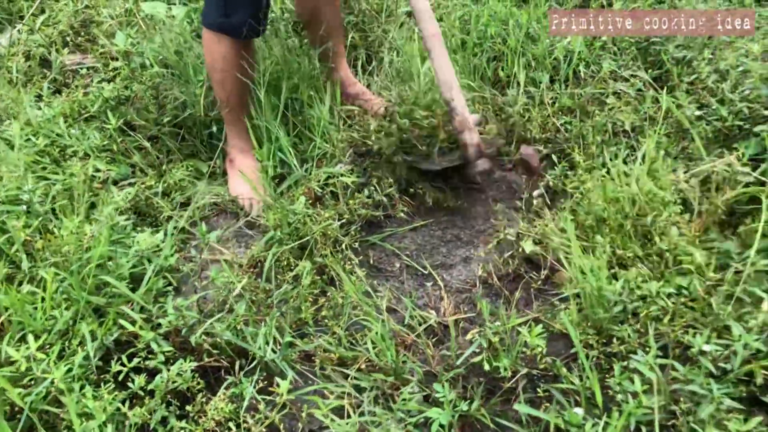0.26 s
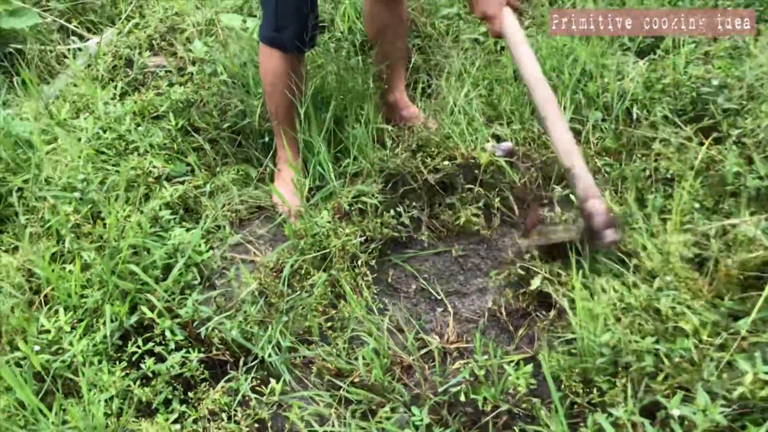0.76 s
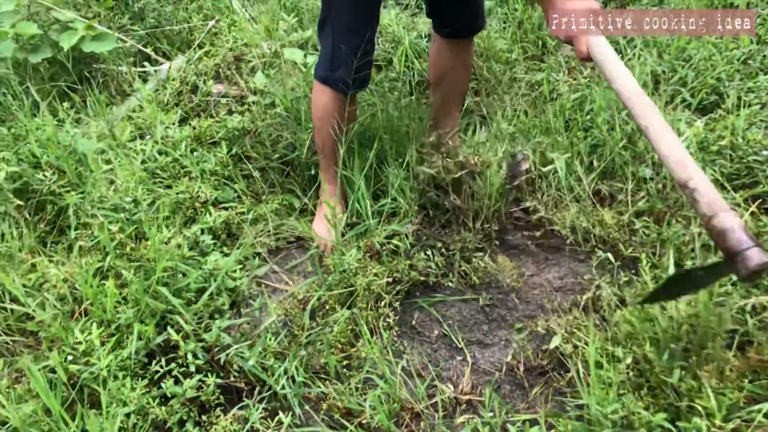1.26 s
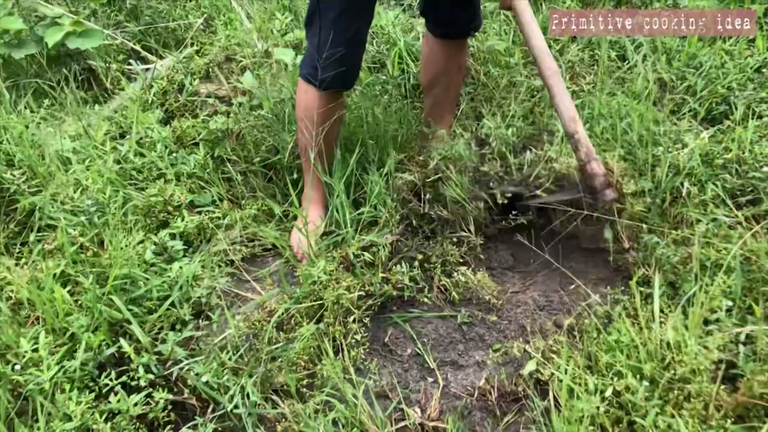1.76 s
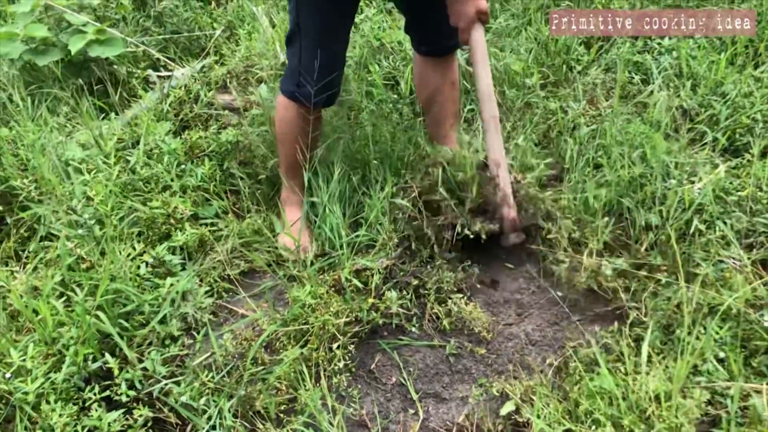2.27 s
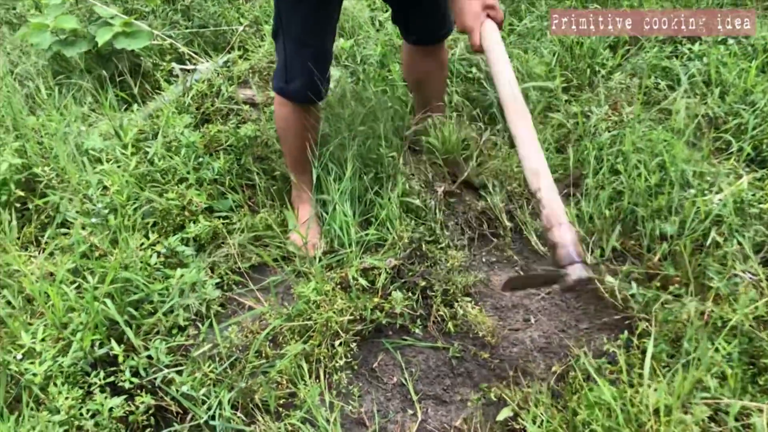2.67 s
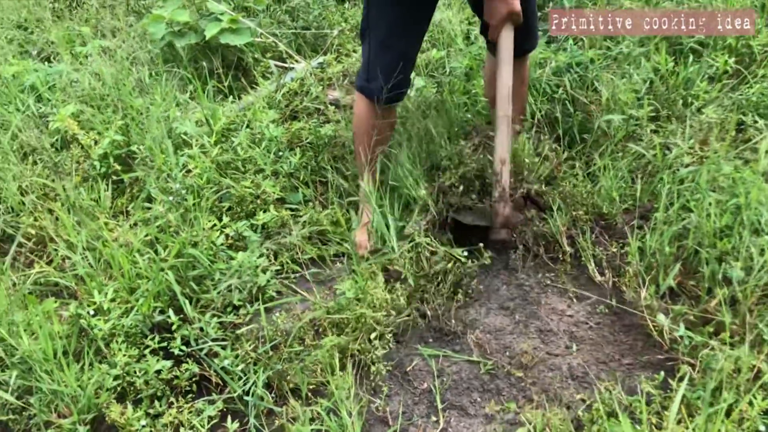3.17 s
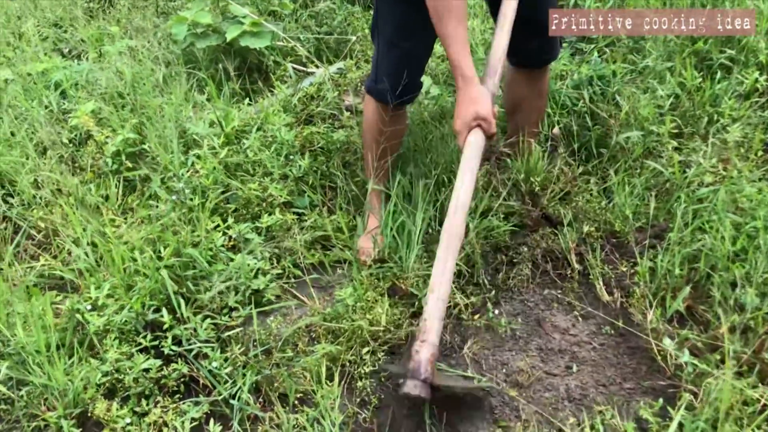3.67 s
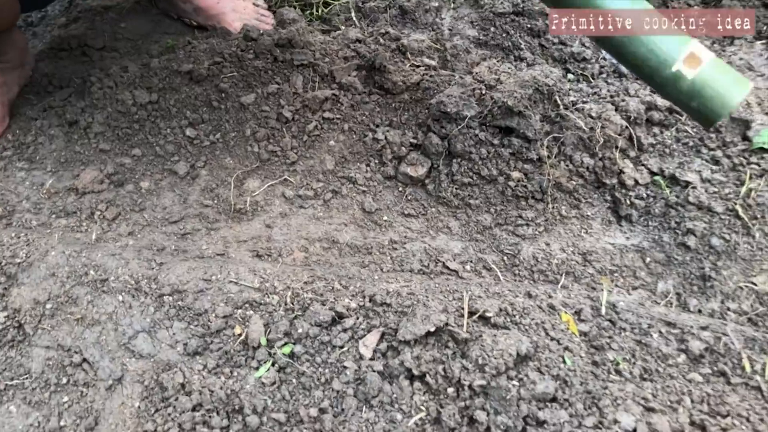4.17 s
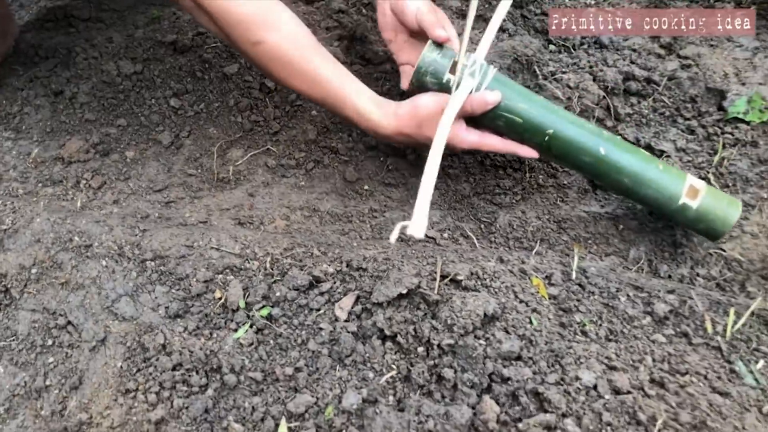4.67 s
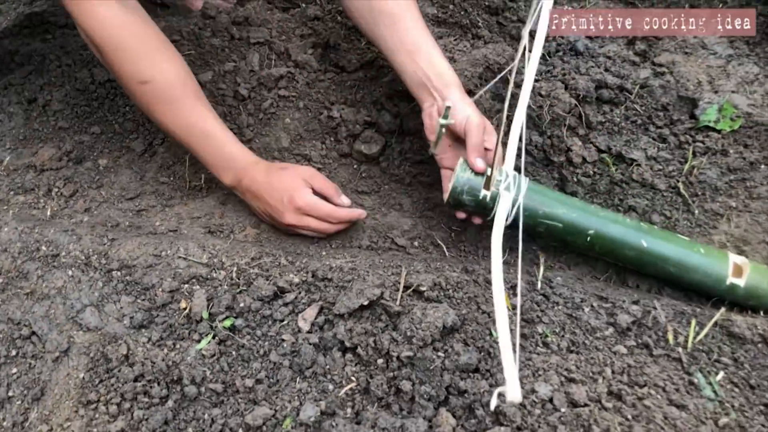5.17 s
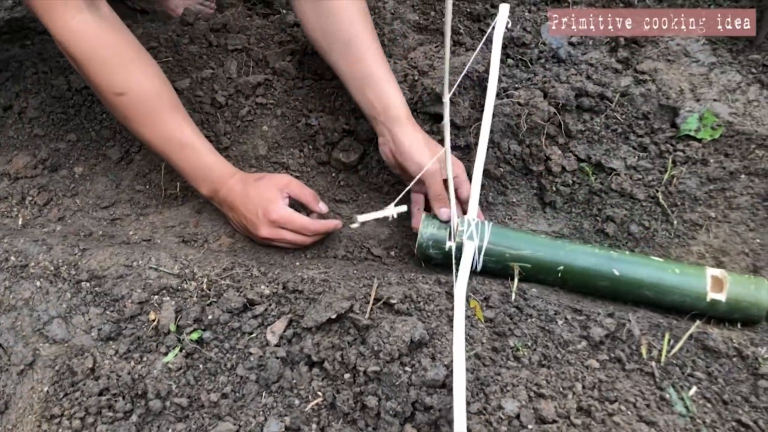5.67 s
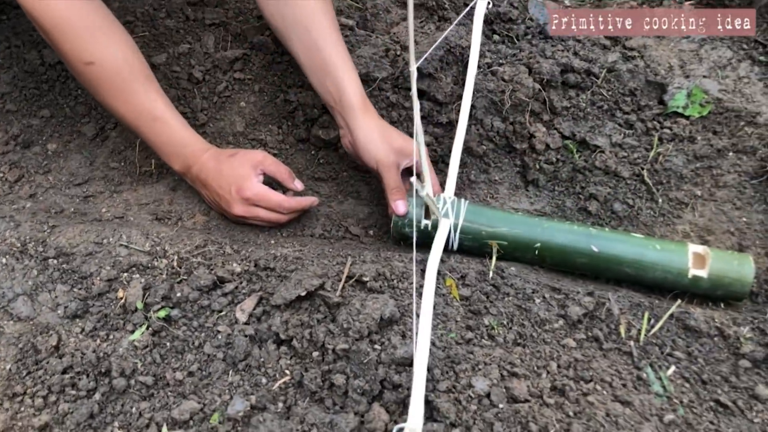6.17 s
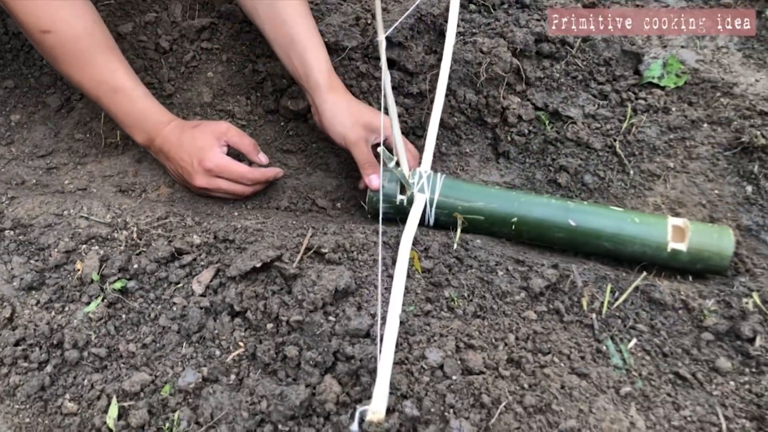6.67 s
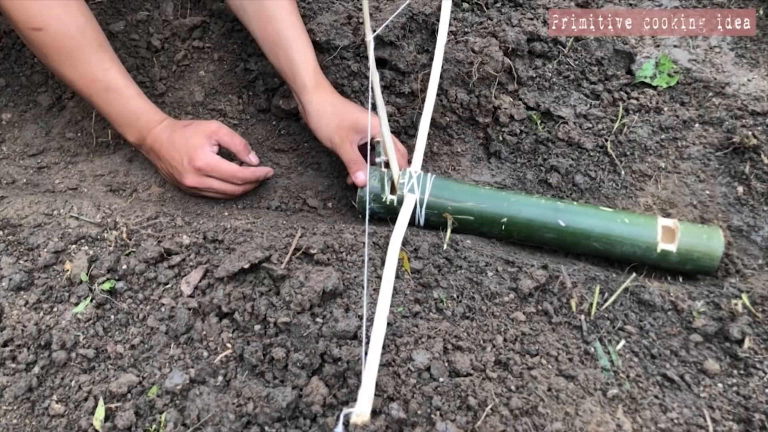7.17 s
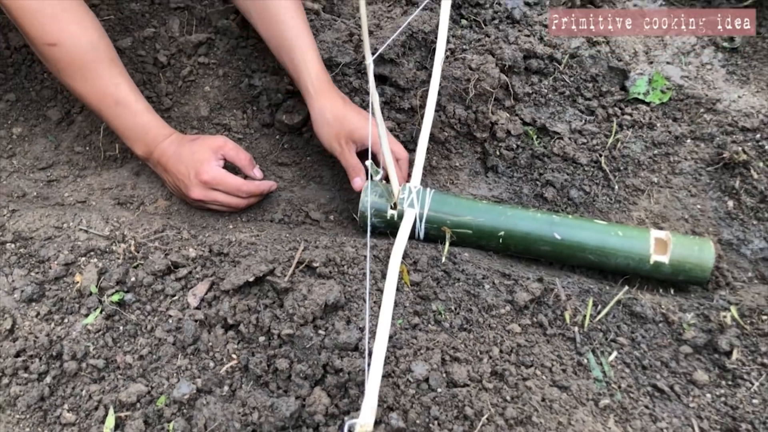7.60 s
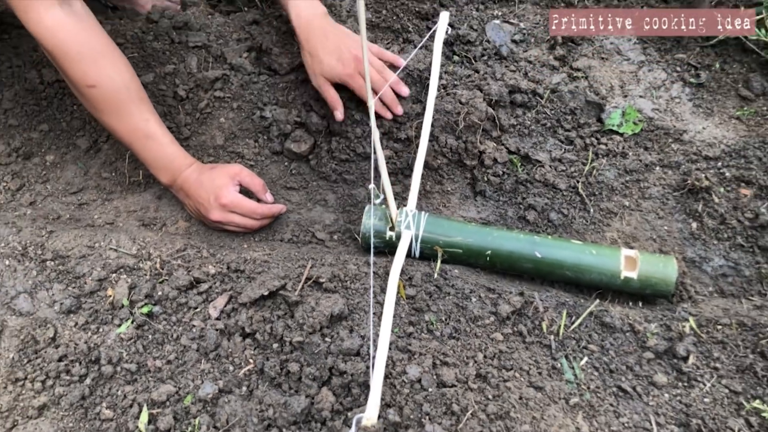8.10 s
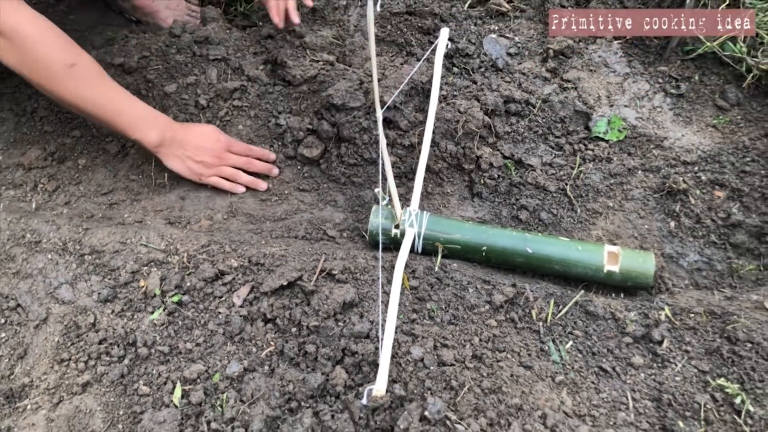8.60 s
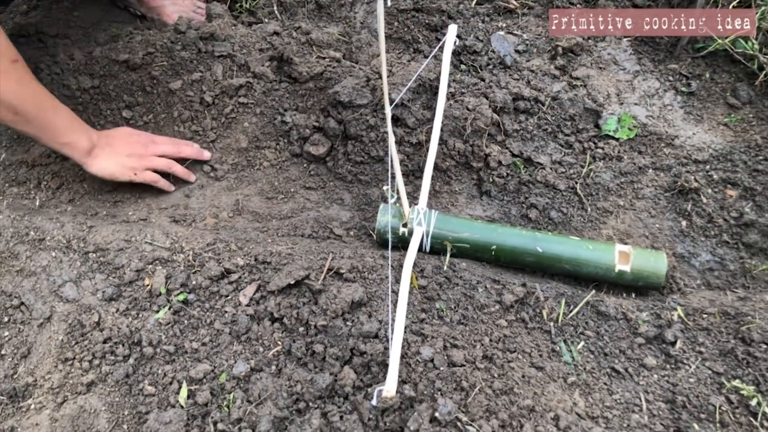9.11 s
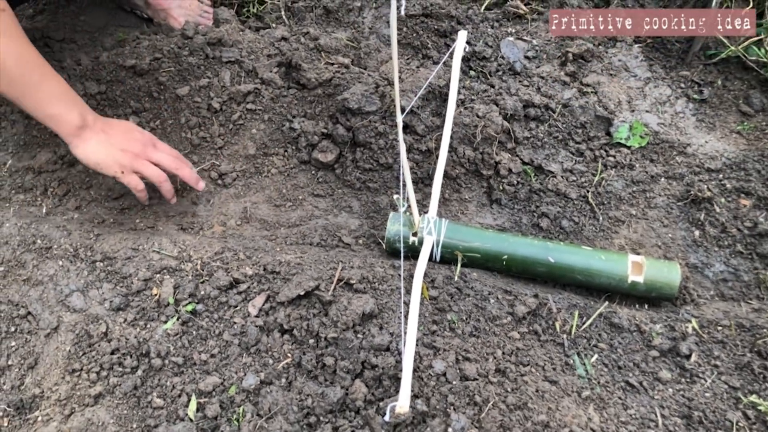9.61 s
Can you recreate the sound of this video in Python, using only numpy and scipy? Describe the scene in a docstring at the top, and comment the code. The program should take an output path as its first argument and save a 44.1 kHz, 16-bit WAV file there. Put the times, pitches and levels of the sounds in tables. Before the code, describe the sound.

Outdoors in grass, a steel hoe bites rooty soil six times in about four seconds, each with a crunch, dull thud, brief metallic ring and tearing grass. Crickets trill steadily throughout. Then an abrupt change to a quieter patch of soil: soft hollow bamboo taps, small ticks and string brushing, katydids chirping, and a distant engine idling then revving up. Close microphone for the actions, open air, no echo.

```python
"""Grass stirs among crickets, then a steel hoe chops six times: gritty noise for soil and grass, dying sines for steel.
At a second, quieter spot hands lay down a bamboo tube and set sticks and string: ticks, tube modes, brushed noise.
Crickets and katydids sing as pulsed noise in narrow resonances, near crickets as notes.
A far engine idles, then speeds up, as sine orders of its shaft; filtered noise is the air of each spot."""
import sys
import numpy as np
from scipy import signal
from scipy.io import wavfile

SR = 44100
rng = np.random.default_rng(int(sys.argv[2]) if len(sys.argv) > 2 else 0)


def to_wav(sig):
    """Store sig (one row per channel, or 1-D mono) as 16-bit WAV at the path in sys.argv[1].

    Samples outside -1..1 are clipped; the rate is SR.
    """
    pcm = np.clip(np.atleast_2d(sig), -1, 1) * 32767
    pcm = np.round(pcm).astype(np.int16)
    wavfile.write(sys.argv[1], SR, pcm.T)  # frames by channels


N = 434385
T = np.arange(N) / SR
MOVE_S = 3.958  # the listener is at the second spot from here on


def amp(db):
    """Amplitude of a level in dB."""
    return 10 ** (np.asarray(db) / 20)


def evened(x):
    """Scales to rms 1."""
    return x / np.sqrt(np.mean(x ** 2) + 1e-20)


def noise():
    """White noise of rms 1."""
    return rng.standard_normal(N)


def curves(rows):
    """Each column after the first, interpolated over time."""
    s, *columns = np.transpose(rows)
    return [np.interp(T, s, column) for column in columns]


def coloured(x, spectrum):
    """Causal minimum-phase filter with the shape of a (Hz, dB) spectrum and power gain 1."""
    f, db = np.transpose(spectrum)
    hz = abs(np.fft.fftfreq(8192, 1 / SR))
    gain_db = np.maximum(np.interp(np.log(hz + 1), np.log(f), db), -80)
    log_gain = np.log(amp(gain_db))
    taps = np.fft.ifft(np.exp(signal.hilbert(log_gain).conj())).real[:4096]
    return signal.oaconvolve(x, taps / np.linalg.norm(taps))[:N]


def resonate(x, hz, width_hz):
    """Moving resonance of gain 1: shifted to 0 Hz, smoothed by two equal poles, shifted back."""
    turn = np.exp(2j * np.pi * np.cumsum(hz * np.ones(N)) / SR)
    r = np.exp(-np.pi * width_hz / SR)
    smooth = signal.lfilter([(1 - r) ** 2], [1, -2 * r, r * r], x / turn)
    return 2 * (turn * smooth).real


def wander(per_s):
    """Slow chance: straight lines between normal random knots."""
    knots = np.arange(0, N / SR + 1, 1 / per_s)
    return np.interp(T, knots, rng.standard_normal(len(knots)))


def grit(per_s, spread_db, cycles, smooth):
    """Snaps of very uneven size, each ringing a few cycles at its own pitch, over a share of plain noise."""
    t, out = T[:2400], np.zeros(N)
    for hz in np.geomspace(350, 15500, 30):
        size = amp(spread_db * np.minimum(rng.exponential(1, N), 4))
        snaps = size * (rng.random(N) < per_s * np.sqrt(hz / 1000) / SR)
        ring = np.exp(-t * hz / cycles) * np.sin(2 * np.pi * hz * t)
        out += np.sqrt(hz) * evened(signal.oaconvolve(snaps, ring)[:N])
    return evened(evened(out) + smooth * noise())


def bursts(s, db, rise_s, t60_s):
    """Envelope of sudden bursts that peak at s."""
    out = np.zeros(N)
    for at, level_db, up, down in np.broadcast(s, db, rise_s, t60_s):
        t = T[:int(1.5 * down * SR)]
        shape = np.minimum(t / up, 1) ** 2 * amp(level_db - 60 * np.maximum(t - up, 0) / down)
        part = out[round((at - up) * SR):][:len(t)]
        part += shape[:len(part)]
    return out


def swells(s, length_s, db):
    """Envelope of soft bell-shaped swells centred on s."""
    return sum(amp(level_db) * np.exp(-(2 * (T - at) / span) ** 2)
               for at, span, level_db in zip(s, length_s, db))


def add(mix, s, peak_db, modes):
    """Adds dying sines (Hz, relative dB, t60 s) of summed peak_db at time s, with a soft start."""
    t = T[:SR // 3]
    ring = sum(amp(db - 60 * t / t60) * np.sin(2 * np.pi * hz * t) for hz, db, t60 in modes)
    body = np.minimum(t / .0015, 1) * ring
    part = mix[round(s * SR):][:len(t)]
    part += (amp(peak_db) * body / abs(body).max())[:len(part)]


# Hoe strokes. Each row: strike in s, sweep growth in dB/s, sweep at the strike in dB, pull at the strike in dB,
# pull fade in dB/s, lift after the strike in s, grass over soil in the pull in dB.
STROKE_ROWS = [(0.252, 302, -45, -54, 36.5, 0.16, 4.5), (0.89, 317, -36, -54.5, 40, 0.24, 7),
               (1.525, 267.5, -42, -47.5, 63.5, 0.24, 3.5), (2.266, 500.5, -54, -49, 34.5, .45, 4),
               (3.041, 1500, -36.5, -45, 47.5, 0.16, 6.5), (3.804, 797.5, -49, -44, 33, 0.1, 7)]
# Tufts torn or brushed aside. Each row: centre in s, length in s, soil crunch in dB, grass swish in dB.
TUFT_ROWS = [(0, 0.2, -65.5, -64), (0.115, 0.064, -65, -59), (0.233, 0.068, -41, -37),
             (1.09, 0.033, -64, -54), (1.317, 0.096, -64.5, -64), (1.97, 0.34, -60.5, -57),
             (2.202, 0.15, -62.5, -51), (2.307, 0.074, -49, -74), (3.5, 1, -65.5, -60.5),
             (3.871, 0.061, -40.5, -42.5)]
REST_SOIL_DB, REST_GRASS_DB = -68.5, -61  # grass stirring between strokes
STOP_DB_PER_S, LIFT_DB_PER_S, SWEEP_GRASS_DB = 282, 198.5, 2


def strokes():
    """Crunch and swish envelopes: the sweep grows to the strike, the pull fades until the lift; tufts tear."""
    s, length_s, soil_db, grass_db = np.transpose(TUFT_ROWS)
    crunch = amp(REST_SOIL_DB) + swells(s, length_s, soil_db)
    swish = amp(REST_GRASS_DB) + swells(s, length_s, grass_db)
    for at, growth, sweep_db, pull_db, fade, lift_s, over_db in STROKE_ROWS:
        t = T - at
        sweep = amp(sweep_db + np.where(t < 0, growth * t, -STOP_DB_PER_S * t))
        pull = (t > 0) * amp(pull_db - fade * abs(t) - LIFT_DB_PER_S * np.maximum(t - lift_s, 0))
        crunch = crunch + sweep + pull
        swish = swish + amp(SWEEP_GRASS_DB) * sweep + amp(over_db) * pull
    return crunch, swish


def root_tearing():
    """Roots snap dully and give way in clumps; small stones clink on the steel and ring longer."""
    roots, stones = grit(80, 3.4, 3, 1.25), grit(16, 2.2, 36, 0)
    return evened(roots + .3 * stones) * amp(1.8 * wander(70))


# Clods and stalks falling. Each row: peak in s, middle in dB, treble in dB.
CRUMB_ROWS = [(0.068, -42, -56), (0.106, -43.5, -57), (0.652, -43.5, -73), (0.672, -48, -68),
              (0.976, -34.5, -46), (1.108, -44, -61), (1.284, -58, -60), (1.307, -39, -61),
              (1.324, -35, -58), (1.648, -38.5, -56), (1.928, -42.5, -55.5), (2.313, -48, -49),
              (2.347, -42, -47), (2.397, -33, -54)]
# Thick roots snapping. Each row: peak in s, middle in dB, treble in dB.
SNAP_ROWS = [(0.278, -16.5, -38), (0.2874, -18.5, -24), (1.577, -20, -23.5), (2.282, -23, -36),
             (3.904, -33, -40)]
REBOUND_S, REBOUND_DB = .003, -5.5  # each snap rebounds once, softer, just after itself
SNAP_RISE_S, SNAP_T60_S = 0.0005, 0.016
# Spectra of soil and of grass. Each row: frequency in Hz, density in dB per Hz.
SOIL_SPECTRUM = [(200, -26), (330, -5), (880, 1), (1300, 1.5), (2900, 1.5), (6000, -9), (8000, -44.5)]
GRASS_SPECTRUM = [(2350, -42), (4000, -4.5), (8600, 1), (11700, 0), (13800, -2), (16000, -7)]


def soil_and_grass(crunch, swish, tearing):
    """Tearing shaped by the strokes, with noise bursts of crumbs and roots, split into soil and grass."""
    rough = noise()
    s, db, treble_db = np.transpose(CRUMB_ROWS)
    soil = crunch * tearing + bursts(s, db, 0.00043, 0.014) * rough
    grass = swish * tearing + bursts(s, treble_db, 0.00098, .012) * rough
    rebounds = [(at + REBOUND_S, a + REBOUND_DB, b + REBOUND_DB) for at, a, b in SNAP_ROWS]
    s, db, treble_db = np.concatenate([SNAP_ROWS, rebounds]).T
    soil += bursts(s, db, SNAP_RISE_S, SNAP_T60_S) * rough
    grass += bursts(s, treble_db, SNAP_RISE_S, SNAP_T60_S) * rough
    return coloured(soil, SOIL_SPECTRUM) + coloured(grass, GRASS_SPECTRUM)


# Modes of the steel blade. Each row: pitch free of soil in Hz, relative level in dB, t60 free of soil in s.
BLADE_MODES = [(913, -3.5, 0.38), (1301, -7.5, 0.69), (1585, 2.5, 0.42), (1993, 1, 0.24),
               (2356, -7.5, 0.34), (2835, -6.5, .3), (3830, -5, 0.289), (4440, -7.5, 0.27), (5570, -4, .3),
               (6500, -9.5, 0.28), (7320, -9.5, .4)]
# Knocks that ring the blade. Each row: start in s, peak in dB, favoured pitch in Hz, freedom from soil 0-1.
KNOCK_ROWS = [(0.257, -26, 1110, 0), (0.867, -36, 950, 1), (.895, -31, 910, 0.25), (.94, -35, 5750, 0.38),
              (.955, -36, 890, 0.05), (0.969, -40, 2870, 0.4), (1.134, -53, 1620, 0.57),
              (1.529, -21.5, 6900, 0.23), (1.537, -20.5, 1075, 0.1), (1.608, -37, 3600, 0.3),
              (1.735, -47.5, 1600, 0.38), (1.777, -48, 1600, 0.16), (1.927, -45, 1200, 0.98),
              (2.267, -27, 1130, 0.1), (2.29, -32, 4480, 0.54), (2.291, -40, 7300, 0.65),
              (3.049, -20, 940, 0.12), (3.066, -20.5, 890, 0.11), (3.094, -38, 890, 0.1),
              (3.802, -23, 1080, 0.19)]
SOIL_SAG = .022  # clinging soil lowers the blade's pitch by up to this share


def blade(crunch, tearing):
    """Scraping keeps the soil-damped modes humming; knocks ring them freely or damped by soil."""
    sound = np.zeros(N)
    for hz, db, _ in BLADE_MODES:
        # single stones ring now one mode, now another
        stones = evened(rng.exponential(1, N) * (rng.random(N) < 30 / SR))
        scrape = crunch * (tearing + amp(6) * stones)
        sound += amp(db + 2.5) * resonate(scrape, hz * (1 - SOIL_SAG), 60)
    for at, peak_db, near_hz, free in KNOCK_ROWS:
        # the spot struck favours modes near one pitch; clinging soil lowers and shortens the ring
        sag = 1 - SOIL_SAG * (1 - free)
        modes = [(hz * sag, db - 60 * np.log2(hz / near_hz) ** 2, t60 * max(free, .05))
                 for hz, db, t60 in BLADE_MODES]
        add(sound, at, peak_db, modes)
    return sound


# Bare feet shifting on soil. Each row: centre in s, length in s, level in dB.
STEP_ROWS = [(1.943, 0.12, -59.5), (2.867, 0.048, -59)]
STEP_HZ, STEP_WIDTH_HZ = 190, 110


def feet():
    """Soft swells of low resonant noise."""
    return swells(*np.transpose(STEP_ROWS)) * evened(resonate(noise(), STEP_HZ, STEP_WIDTH_HZ))


# Blade biting roots and stones. Each row: peak in s, soil crunch in dB, grass swish in dB, thud in dB,
# t60 of crunch and swish in s.
BITE_ROWS = [(.256, -24.5, -24, -37, 0.052), (.894, -22.5, -18.5, -31.5, 0.072),
             (.919, -33.5, -32, -53.5, 0.04), (.955, -58, -38, -52, 0.059), (1.526, -41, -29, -43, 0.1),
             (1.537, -37.5, -37.5, -36.5, .11), (1.553, -32, -34, -61.5, 0.16),
             (2.265, -26, -26, -39, 0.05), (3.038, -34.5, -38.5, -40, 0.048),
             (3.052, -20.5, -17.5, -53, 0.028), (3.065, -20, -55, -32.5, 0.015),
             (3.802, -22, -25.5, -40.5, 0.036), (3.815, -35, -47, -43, 0.043)]
# Spectrum of the thud. Each row: frequency in Hz, density in dB per Hz.
THUD_SPECTRUM = [(40, -23.5), (85, -1.5), (170, 7), (280, -0.5), (500, 0.5), (750, -25)]
BITE_RISE_S = .0075


def hoe():
    """Strokes and bites drive soil crunch, grass swish, a dull thud and the blade; feet shift."""
    crunch, swish = strokes()
    s, db, treble_db, thud_db, t60_s = np.transpose(BITE_ROWS)
    # the thud rises and dies slower than the crunch
    low = amp(-15.5) * crunch + bursts(s, thud_db, 1.5 * BITE_RISE_S, 1.8 * t60_s)
    crunch = crunch + bursts(s, db, BITE_RISE_S, t60_s)
    swish = swish + bursts(s, treble_db, BITE_RISE_S, t60_s)
    tearing = root_tearing()
    sound = soil_and_grass(crunch, swish, tearing) + coloured(low * noise(), THUD_SPECTRUM)
    sound += blade(crunch, tearing) + feet()
    return sound * (T < MOVE_S)


def hand_treble(x):
    """Treble tone shared by brushing and tapping."""
    return coloured(x, [(2500, -34.0), (5500, 12), (9000, 7.5), (12000, 6.5), (16000, -9.0)])


# Sticks and nails tapping. Each row: start in s, tick in dB, treble in dB, tick pitch in Hz, tube ring in dB.
TAP_ROWS = [(4.077, -55, -56, 950, -48), (4.133, -48.5, -48, 1195, -44), (5.343, -56.5, -50, 1870, -70),
            (5.505, -56, -69.5, 1050, -59), (5.555, -55, -75, 1000, -55), (5.666, -58, -60, 2120, -61),
            (6.057, -48, -64, 2560, -48.5), (6.144, -42, -39.5, 2570, -67), (6.145, -48, -70, 3210, -51.5),
            (6.528, -56, -72, 1820, -53), (7.455, -64, -71, 4000, -83), (7.788, -52.5, -64, 2090, -71),
            (7.796, -51, -72, 2150, -70), (7.797, -69, -80, 1150, -62), (7.961, -53.5, -53.5, 1060, -68.5),
            (9.583, -60.5, -80, 1040, -78)]
# Modes of the tube lying on the soil. Each row: pitch in Hz, relative level in dB, t60 in s.
TUBE_MODES = [(542, 11, 0.24), (1309, 7, 0.2), (1860, -2, .07), (2600, 3, .05), (3170, 1.5, 0.05)]
TAP_NOISE_DB = -2  # dull noise of a tap against its tick
LAID_S, HELD_PITCH = 5.8, .87  # until then fingers over the mouth lower the tube's note by this factor
HELD_CYCLES = 65  # the grip damps the tube: its lowest mode dies in this many cycles, higher ones far sooner


def taps():
    """Each tap is a short tick, noise in middle and treble, and the hollow tube's modes."""
    s, db, treble_db, tick_hz, ring_db = np.transpose(TAP_ROWS)
    treble = bursts(s, treble_db, 0.0015, 0.026) * noise()
    sound = hand_treble(coloured(treble, [(3000, 7.0), (11000, -5.0), (13500, -12), (16000, -12)]))
    dull = bursts(s, db + TAP_NOISE_DB, 0.00095, 0.039) * noise()
    sound += coloured(dull, [(300, -24), (900, -4.5), (3500, -6.5), (6000, -19)])
    lowest_hz = TUBE_MODES[0][0]
    held = [(hz * HELD_PITCH, level_db, HELD_CYCLES / hz * (lowest_hz / hz) ** .5)
            for hz, level_db, _ in TUBE_MODES]
    for at, tick_db, hz, tube_db in zip(s, db, tick_hz, ring_db):
        add(sound, at, tick_db, [(hz, 0, .03 if at < LAID_S else .05)])
        add(sound, at, tube_db, held if at < LAID_S else TUBE_MODES)
    return sound


# Skin and string brushing soil and bamboo. Each row: centre in s, length in s, middle in dB,
# centre of the middle in Hz, treble in dB.
RUSTLE_ROWS = [(4.05, 0.12, -66, 2110, -64), (4.309, 0.072, -57.5, 2690, -74),
               (4.675, 0.19, -68, 1200, -72), (4.855, 0.21, -72, 2040, -70), (5.216, 0.08, -66, 993, -69.5),
               (5.282, 0.075, -65, 2500, -66.5), (5.35, 0.039, -61, 1500, -64),
               (5.593, 0.066, -68, 1500, -86), (5.677, 0.1, -61, 2090, -62.5),
               (6.486, 0.13, -72, 2220, -66.5), (7.802, .06, -71, 2520, -66.5),
               (9.09, 0.13, -69, 1902, -81.5)]
SCUFF_WIDTH_HZ, SCUFF_BROAD_DB = 1500, 0  # the middle gathers round its centre over a broad part


def rustles(rubbing):
    """Swells of gritty rubbing, its middle drawn to a moving centre."""
    s, length_s, middle_db, centre_hz, treble_db = np.transpose(RUSTLE_ROWS)
    gathered = evened(resonate(rubbing, np.interp(T, s, centre_hz), SCUFF_WIDTH_HZ))
    broad = evened(coloured(rubbing, [(300, -19), (800, -1.0), (2500, -2.5), (4500, 0.0), (8000, -10.0)]))
    scuff = evened(gathered + amp(SCUFF_BROAD_DB) * broad)
    treble = hand_treble(swells(s, length_s, treble_db) * rubbing)
    return swells(s, length_s, middle_db) * scuff + treble


# Dry grains of soil and fibres of string cracking. Each row: peak in s, middle in dB, treble in dB.
TICK_ROWS = [(4.394, -66, -62), (4.517, -57, -80), (4.834, -70, -58), (5.871, -75, -62), (6.160, -62, -52),
             (6.179, -72, -59), (6.195, -58, -56), (6.925, -62, -58), (8.177, -57, -62), (8.697, -58, -61),
             (9.063, -55, -78), (9.609, -59, -76), (9.662, -59, -76)]


def cracks():
    """Short noise bursts, with many more faint clicks strewn at random."""
    s, db, treble_db = np.transpose(TICK_ROWS)
    sharp = evened(np.gradient(noise()))
    stray = amp([[-47], [-57]]) * rng.exponential(1, N) * (rng.random((2, N)) < 12 / SR)
    middle = bursts(s, db, 0.00072, 0.015) * noise() + np.gradient(stray[0])
    treble = bursts(s, treble_db, .0006, 0.015) * sharp + np.diff(stray[1], prepend=0)
    return coloured(middle, SOIL_SPECTRUM) + coloured(treble, GRASS_SPECTRUM)


# String creaking on the sticks. Each row: centre in s, length in s, level in dB, pitch in Hz.
CREAK_ROWS = [(7.626, 0.15, -71.5, 2100)]
# String slipping in even jerks. Each row: centre in s, length in s, level in dB, jerks per second.
SLIP_ROWS = [(5.219, 0.043, -61.5, 260)]


def string(rubbing):
    """Creaks are rubbing in resonances at a pitch and its half; slips are even jerks in a broad resonance."""
    sound = np.zeros(N)
    for at, span, db, hz in CREAK_ROWS:
        creak = resonate(rubbing, hz, 280) + .5 * resonate(rubbing, hz / 2, 150)
        sound += swells([at], [span], [db]) * evened(creak)
    for at, span, db, per_s in SLIP_ROWS:
        jerks = np.diff(np.floor(per_s * T), prepend=0)
        sound += swells([at], [span], [db]) * evened(resonate(jerks, 660, 2300))
    return sound


def hands():
    """Brushing, tapping, cracking and string at the second spot; the rubbing comes in uneven clumps."""
    rubbing = evened(grit(45, 3.3, 8, .9) * amp(3 * wander(30)))
    return (rustles(rubbing) + taps() + cracks() + string(rubbing)) * (T >= MOVE_S)


def wings(hz, bands, strokes_per_s, depth, crisp=0):
    """Wing scraping: noise pulsed at the stroke rate, with a share of one crisp snap a stroke, in steep resonances."""
    turns = np.cumsum(strokes_per_s * (1 + 0.015 * wander(4.4) + .05 * wander(150))) / SR
    pulsed = noise() * (1 + depth * np.cos(2 * np.pi * turns))
    snaps = np.diff(np.floor(turns), prepend=0)
    scrape = (1 - crisp) * evened(pulsed) + crisp * evened(snaps)
    out = np.zeros(N)
    for offset_hz, width_hz, db in bands:
        once = resonate(scrape, hz + offset_hz, width_hz)
        out += amp(db) * evened(resonate(once, hz + offset_hz, width_hz))
    return evened(out)


# Cricket chorus. Each row: time in s, level in dB.
CHORUS_LEVEL = [(0, -61), (2.6, -60.5), (3, -55.5), (3.9, -58.5), (3.96, -61), (7.7, -60.5), (8.2, -57.5),
                (8.7, -59.5), (9.85, -59.5)]
# Near singers heard as clear notes. Each row: offset from the chorus in Hz, level against it in dB.
NEAR_SINGERS = [(20, -14.5), (-90.5, -10.5), (-190, -10)]


def crickets():
    """Trills in groups of three pulses; far singers blur into a chorus, near ones keep a clear note."""
    phase = 2 * np.pi * np.cumsum(25.0 * (1 + 0.027 * wander(2.6))) / SR
    pitch_hz = np.where(T < MOVE_S, 4780, 4830) + 20 * wander(11.0)
    trill = evened(1 + 0.22 * np.cos(phase) + 0.09 * np.cos(2 * phase) + 0.17 * np.cos(3 * phase))
    song = wings(pitch_hz, [(5, 500, 0), (-130, 700, -5)], 24, 0) * trill
    for offset_hz, db in NEAR_SINGERS:
        note = np.sin(2 * np.pi * np.cumsum(pitch_hz + offset_hz + 30 * wander(40)) / SR)
        song = song + amp(db + 2.5 * wander(9.3)) * note * trill ** 2
    level_db, = curves(CHORUS_LEVEL)
    return amp(level_db + 1.2 * wander(7)) * evened(song)


# A buzzing katydid. Each row: time in s, level in dB, pitch in Hz.
BUZZ_SONG = [(0, -66, 9800), (.7, -61.5, 10050), (2, -62.5, 10050), (2.45, -56.5, 9460), (3, -65, 9960),
             (3.9, -64, 9400), (3.96, -74, 10350), (5.5, -83, 10620), (6.3, -75.5, 10670), (7, -81, 10570),
             (9.85, -77.5, 10360)]


def buzzing_katydid():
    """Unbroken fast wing strokes in one broad resonance."""
    db, hz = curves(BUZZ_SONG)
    return amp(db) * wings(hz, [(0, 1050, 0)], 113, .45, .15)


CHIRP_GROWTH_DB = 5  # each chirp grows by this much per chirp period, then stops short


def chirping(count, song, bands, strokes_per_s, duty, glide_hz):
    """A katydid: each chirp swells round a whole count and rises a little in pitch."""
    phase = (curves(count)[0] + .5) % 1 - .5
    db, hz = curves(song)
    gate = amp(CHIRP_GROWTH_DB * phase) * np.exp(-(phase / duty) ** 8)
    gate = gate * (T > song[0][0]) * (T < song[-1][0])
    return amp(db + 2 * wander(9)) * gate * wings(hz + glide_hz * phase, bands, strokes_per_s, .6, .14)


# Chirp counts of a high and a low katydid. Each row: time in s, running chirp count.
HIGH_CHIRPS = [(4.41, -2.35), (6.6, 14.6), (9.05, 33.1), (9.25, 34.05), (9.84, 38.5)]
LOW_CHIRPS = [(5.6, .5), (6.5, 7.35), (7.6, 15.7), (8.79, 24.5)]
# Songs of the two. Each row: time in s, level in dB, pitch in Hz.
HIGH_VOICE = [(4.41, -84, 9100), (5.1, -71, 9050), (7, -70, 9100), (7.9, -72.5, 9100), (8.7, -68, 9130),
              (9.2, -73, 9280), (9.84, -73, 9360)]
LOW_VOICE = [(5.6, -88, 7820), (5.95, -78, 7820), (7, -75.5, 7820), (8.5, -76, 7820), (8.79, -92, 7820)]
# Two wing resonances of the high one. Each row: offset from the pitch in Hz, width in Hz, relative level in dB.
HIGH_WINGS = [(0, 680, 0), (-540, 440, -3.5)]


def chirping_katydids():
    """Two katydids chirp, each with its own count, pitch and wing-stroke rate."""
    high = chirping(HIGH_CHIRPS, HIGH_VOICE, HIGH_WINGS, 124, .33, 350)
    return high + chirping(LOW_CHIRPS, LOW_VOICE, [(0, 620, 0)], 116, .26, 100)


# Engine shaft. Each row: time in s, turns per second.
SHAFT_SPEED = [(4, 22.7), (4.9, 22.3), (5.2, 21.2), (5.7, 21.2), (6, 22.4), (6.2, 26.3), (6.45, 29.1),
               (6.8, 30.5), (8.3, 30.3), (9.85, 30.8)]
# Engine level. Each row: time in s, level in dB.
ENGINE_LEVEL = [(3.95, -75), (4, -62.5), (5.7, -63.5), (6.05, -60.5), (6.45, -62), (6.8, -67), (8.3, -65.5),
                (9.85, -64)]
# Shaft orders. Each row: multiple of the shaft speed, idling level in dB, loaded level in dB.
SHAFT_ORDERS = [(2, -11.5, 2.5), (3, -13.5, -5.5), (4, -6.5, -4), (5, -1.5, -5), (6, -2.5, -34)]
IDLE_HZ, LOADED_HZ = 21.7, 31.4  # load grows with shaft speed between these


def engine():
    """Shaft orders that waver on the long way over; load favours the low ones."""
    (speed,), (db,) = curves(SHAFT_SPEED), curves(ENGINE_LEVEL)
    turns = np.cumsum(speed * (1 + .003 * wander(6))) / SR
    load = np.clip((speed - IDLE_HZ) / (LOADED_HZ - IDLE_HZ), 0, 1)
    out = np.zeros(N)
    for multiple, idle_db, full_db in SHAFT_ORDERS:
        order_db = db + idle_db + load * (full_db - idle_db) + 1.8 * wander(13.0)
        out += amp(order_db) * np.sin(2 * np.pi * (round(multiple) * turns + rng.random()))
    return out


# Background spectra of the first and second spot. Each row: frequency in Hz, density in dB per Hz.
FIRST_SPOT = [(25, -15), (60, -4), (130, -3.5), (350, -8.5), (700, -18), (1500, -20), (4000, -14),
              (10000, -21.5), (16500, -30.5)]
SECOND_SPOT = [(25, -25), (45, -7.5), (70, 4), (130, -4.5), (250, -7), (500, -13.5), (1000, -18.5),
               (2000, -22), (3800, -25), (6600, -24), (8150, -25), (8800, -21.5), (10000, -21),
               (11300, -25.5), (13000, -30), (16500, -34)]
FIRST_DB, SECOND_DB = -61.5, -63.5


def air():
    """Leaves, far insects and distant rumble at each spot, as wavering filtered noise."""
    first, second = (coloured(amp(0.61 * wander(7.9)) * noise(), spot) for spot in (FIRST_SPOT, SECOND_SPOT))
    return np.where(T < MOVE_S, amp(FIRST_DB) * first, amp(SECOND_DB) * second)


def scene():
    """Sums all sources into one channel."""
    insects = crickets() + buzzing_katydid() + chirping_katydids()
    return (hoe() + hands() + insects + engine() + air())[None]


EDGE_HZ = 15850


def record(dry):
    """The microphone loses the deepest bass; then the band limit."""
    thinned = signal.sosfilt(signal.butter(2, 42, "high", fs=SR, output="sos"), dry)
    low_pass = signal.firwin(511, EDGE_HZ, window=("kaiser", 9), fs=SR)
    return signal.oaconvolve(thinned, low_pass[None], "same")


dry = scene()
out = record(dry)
to_wav(out)
```